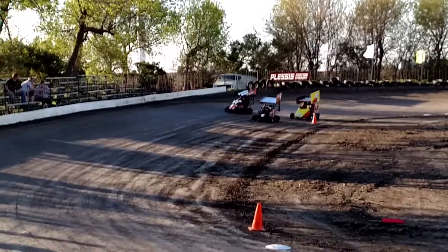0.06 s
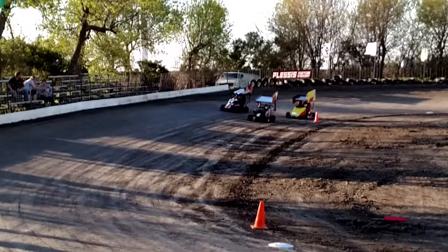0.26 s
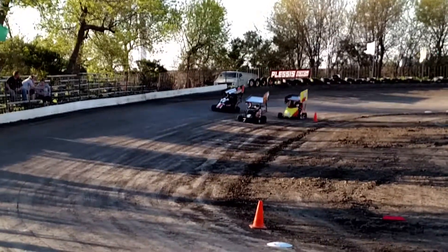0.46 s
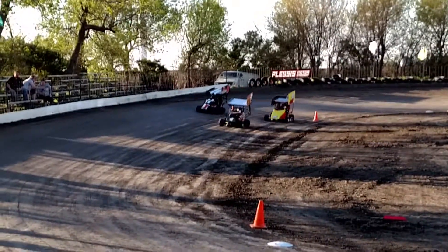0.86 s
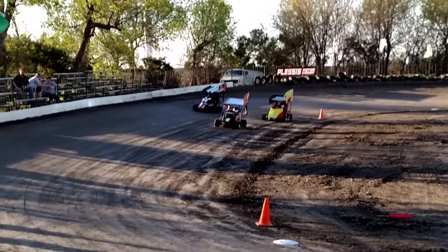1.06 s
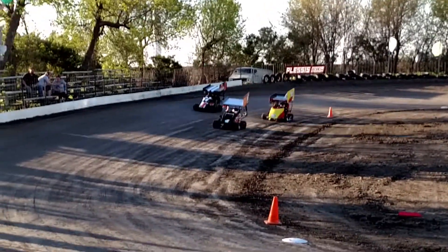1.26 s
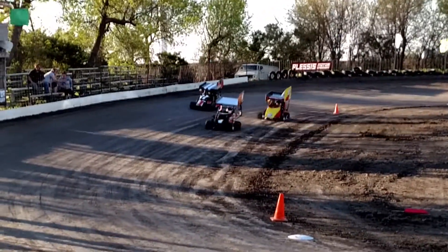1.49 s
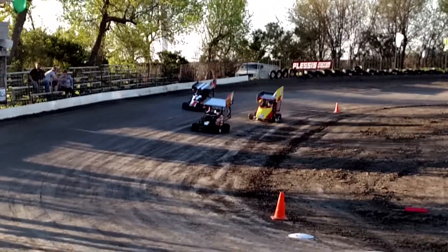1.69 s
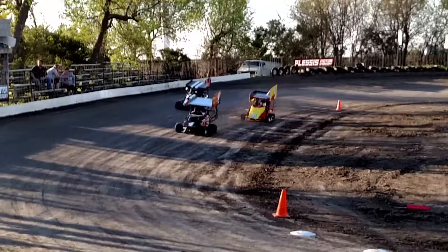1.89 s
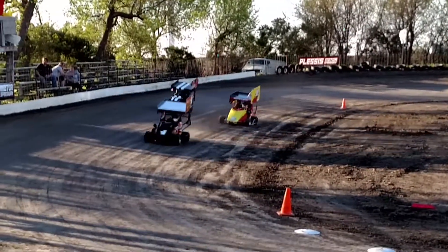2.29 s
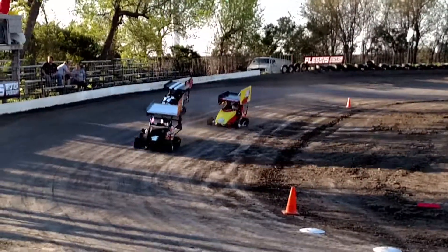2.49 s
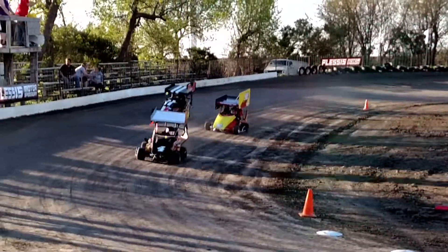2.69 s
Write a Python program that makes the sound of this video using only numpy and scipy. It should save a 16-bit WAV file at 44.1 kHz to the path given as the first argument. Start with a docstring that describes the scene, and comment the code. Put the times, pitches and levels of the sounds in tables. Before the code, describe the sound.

Small race car engines drone with a raspy buzz on an open dirt track. A gust briefly overloads the microphone, the engines grow louder among a few dry clicks, and the wind buffets again as one car accelerates.

```python
"""Three small single-cylinder race cars come out of a dirt turn: one holds its revs, one speeds up,
one is far off. Each firing thumps through an exhaust pipe over rasp and hiss; wall and trees answer.
Near 0.6 s a gust thumps and cracks on the microphone, overloading it, and the limiter ducks the cars.
The engines swell toward 1.4 s, among a few dry clicks. From 2 s the nearest engine ticks and more
gusts hit. At the end, 2.85 s, the steady car fades and the far one grows loud."""
import sys
import numpy as np
from scipy import signal
from scipy.fft import rfft, irfft, next_fast_len
from scipy.io import wavfile
from scipy.ndimage import map_coordinates

SR = 44100
rng = np.random.default_rng(int(sys.argv[2]) if len(sys.argv) > 2 else 0)


def wrap_up_sound(samples):
    """Save the sound to the file named by the first command line argument, as 16-bit audio."""
    columns = np.atleast_2d(samples).T
    # keep every value between -1 and 1, then stretch to whole-number steps
    tamed = np.clip(columns, -1, 1)
    steps = np.round(tamed * 32767).astype(np.int16)
    wavfile.write(sys.argv[1], SR, steps)


N = 125685


def amp(db):
    """Decibels to gain."""
    return 10 ** (np.asarray(db) / 20)


def unit(x):
    """Scale to rms 1."""
    return x / np.sqrt(np.mean(x ** 2) + 1e-20)


def along(points, hz):
    """Interpolate (Hz, value) points on a log axis."""
    knots_hz, values = np.transpose(points)
    return np.interp(np.log(hz + 1), np.log(knots_hz + 1), values)


def curves(rows):
    """One value per sample for each column after the time."""
    times_s, *columns = np.transpose(rows)
    return [np.interp(np.arange(N) / SR, times_s, column) for column in columns]


def wobble(rate_hz):
    """Smooth random curve, rate_hz knots a second."""
    knots = rng.standard_normal(int(N * rate_hz / SR) + 4)
    return map_coordinates(knots, [np.arange(N) * rate_hz / SR])


def colour(x, points):
    """Minimum-phase filter with the given (Hz, dB) response."""
    size = 2 * next_fast_len(N)
    cepstrum = irfft(along(points, np.fft.rfftfreq(size, 1 / SR)) * np.log(10) / 20, size)
    cepstrum[1:size // 2] *= 2
    cepstrum[size // 2 + 1:] = 0
    return irfft(rfft(x, size) * np.exp(rfft(cepstrum)), size)[:N]


# Outdoor decay. Each row: frequency in Hz, t60 in seconds.
ECHO_T60_S = [(150, 0.53), (1500, 0.95), (8000, 0.19)]

def echo(x):
    """Diffuse answer of the wall and the trees."""
    hz, t, noise = signal.stft(rng.standard_normal(SR // 2), SR, nperseg=256)
    decay = amp(-60 * t / along(ECHO_T60_S, hz)[:, None])
    tail = signal.istft(noise * decay, SR, nperseg=256)[1]
    return signal.fftconvolve(x, tail / np.linalg.norm(tail))[:N]


# Hiss spectrum. Each row: frequency in Hz, gain in dB.
HISS_SPECTRUM_DB = [(1500, -17.5), (3300, 4.5), (3700, 1.5), (4150, -6), (4600, 0), (5300, -3.5),
                    (6500, -8.5), (7800, -14.5), (9000, -18.5), (12000, -26), (15500, -31.5)]
# Hiss envelope. Each row: time in seconds, relative level in dB.
HISS_LEVEL_DB = [(0, -67), (.45, -65.5), (.9, -60), (1.4, -60), (1.65, -55.5), (2, -60.5), (2.22, -57.5),
                 (2.45, -60.5), (2.65, -62), (2.85, -56.5)]

def hiss(lift_db=3.5):
    """Flickering hiss of chains and tyres."""
    noise = unit(colour(rng.standard_normal(N), HISS_SPECTRUM_DB))
    return noise * amp(curves(HISS_LEVEL_DB)[0] + lift_db + 1.3 * wobble(90))


# Valve resonances. Each row: frequency in Hz, gain in dB.
TICK_SPECTRUM_DB = [(2000, -14), (3200, 12), (4100, -9.5), (5000, 8.5), (6000, -3), (7000, -8),
                    (7900, -6.5), (9000, -18.5), (15000, -32.5)]
# Tick envelope. Each row: time in seconds, level in dB.
TICK_LEVEL_DB = [(0, -89), (1.9, -73), (2.2, -55), (2.5, -63), (2.85, -53.5)]

def valve_ticks():
    """The valves of the nearest engine tick once a cycle."""
    bursts = puffs(RISING_FIRING_HZ, decay_cycles=.14, floor=.08, lag_cycles=.63)
    return unit(colour(bursts, TICK_SPECTRUM_DB)) * amp(curves(TICK_LEVEL_DB)[0] + 1.4 * wobble(30))


# Each row: start in seconds, level in dB, pitch in Hz, t60 in seconds, second mode in relative dB.
DRY_CLICKS = [(0.0804, -17.5, 724, 0.01, -10.5), (1.079, -37, 3020, 0.018, -24.5),
              (1.590, -9, 1018, 0.008, -6.5), (1.827, -25.5, 1220, .005, -10),
              (1.942, -27.5, 2480, 0.01, -20), (2.5106, -16, 1050, 0.008, -9.5)]

def clicks(overtone_ratio=2.16):
    """Short dry clicks, each with two quickly damped modes."""
    out, t = np.zeros(N + SR), np.arange(SR // 20) / SR
    for start_s, db, hz, t60_s, second_db in DRY_CLICKS:
        phase = 2 * np.pi * hz * t
        modes = np.sin(phase) - amp(second_db) * np.sin(overtone_ratio * phase)
        out[round(start_s * SR):][:len(t)] += amp(db - 60 * t / t60_s) * modes
    return out[:N]


# Turbulence and crack spectra. Each row: frequency in Hz, gain in dB.
BUFFET_SPECTRUM_DB = [(15, -15), (30, -2.5), (60, -1.5), (120, 2), (180, 2.5), (300, -7), (450, -16.5),
                      (700, -22.5), (1200, -41.5), (3000, -54), (8000, -94)]
CRACK_SPECTRUM_DB = [(300, 6), (1100, 7), (2000, -7), (4000, -15), (8000, -30), (15000, -35)]
# Turbulence envelope. Each row: time in seconds, relative level in dB.
WIND_LEVEL_DB = [(0, -23), (.04, -29.5), (.08, -40), (.19, -36.5), (.25, -25.5), (.29, -37), (.32, -22),
                 (.47, -23), (.53, -16.5), (.58, -23), (.64, -14), (.72, -20.5), (.83, -18), (.89, -31.5),
                 (1.07, -39.5), (1.115, -19), (1.16, -21.5), (1.2, -21.5), (1.38, -45), (1.52, -28.5),
                 (1.58, -35), (1.7, -30.5), (1.82, -38.5), (1.95, -28), (2.05, -31.5), (2.13, -34),
                 (2.21, -24), (2.26, -9), (2.33, -18), (2.37, -15.5), (2.41, -20.5), (2.45, -12.5),
                 (2.5, -22), (2.555, -15.5), (2.59, -27.5), (2.68, -31), (2.85, -44)]
# Eddies. Each row: centre in seconds, envelope peak in dB, pitch in Hz.
EDDIES = [(.322, -8.5, 113), (0.341, -10, 126), (0.3739, -1, 156), (.407, -3.5, 200), (.4375, -10, 200),
          (0.5117, -5.5, 120), (0.523, -12, 378), (0.5312, -5, 167), (0.542, -8, 210), (.550, -10, 98),
          (0.594, -9.5, 165), (0.608, 4, 149), (0.6273, 7, 124.5), (0.6449, 1, 274), (0.6601, 5.5, 212),
          (0.668, 1.5, 135), (.682, 0, 150), (0.7015, 5.5, 264), (0.7525, 0, 164), (0.843, -6, 233),
          (1.124, -1.5, 162), (1.129, -5, 194), (1.141, -10, 132), (1.148, -6, 160), (1.868, -19, 189),
          (2.036, -5, 116), (2.237, -5, 220), (2.25, -14.5, 165), (2.2651, -3, 190), (2.274, -3.5, 99),
          (2.3001, 0.5, 295), (2.3132, 2.5, 156), (2.358, -4.5, 219), (2.379, -4.5, 166),
          (2.435, -9.5, 304), (2.4534, -4, 139), (2.538, -9, 150), (2.553, -3.5, 158), (2.558, -12, 470),
          (2.569, 3.5, 146)]

def wind(width_cycles=.48, steepen=.31, crack_s=.6085, crack_db=-15):
    """Turbulence and steep-fronted eddies push and pull the diaphragm; one gust near 0.6 s cracks."""
    out = unit(colour(rng.standard_normal(N), BUFFET_SPECTRUM_DB)) * amp(curves(WIND_LEVEL_DB)[0] + 3)
    for centre_s, db, hz in EDDIES:
        offset_cycles = (np.arange(N) / SR - centre_s) * hz
        phase = 2 * np.pi * offset_cycles
        envelope = amp(db) * np.exp(-.5 * (offset_cycles / width_cycles) ** 2)
        out -= envelope * np.sin(phase + steepen * np.sin(phase))
    crack = colour(signal.unit_impulse(N, round(crack_s * SR)), CRACK_SPECTRUM_DB)
    return out - amp(crack_db) * crack / np.abs(crack).max()


def cycles(firing_hz):
    """Engine cycles completed so far."""
    return np.cumsum(curves(firing_hz)[0]) / SR


def puffs(firing_hz, decay_cycles, floor, lag_cycles=0):
    """Noise that jumps once an engine cycle and decays toward a floor."""
    age_cycles = (cycles(firing_hz) - lag_cycles) % 1
    return unit((floor + np.exp(-age_cycles / decay_cycles)) * rng.standard_normal(N))


# Escaping gas. Each row: frequency in Hz, gain in dB.
RASP_SPECTRUM_DB = [(100, -24), (400, -12), (570, 3), (800, 14), (1100, 8), (1450, 8.5), (1850, 6),
                    (2100, .5), (2500, -1.5), (3400, -14), (4100, -29), (6000, -54.5)]
# Rasp envelope. Each row: time in seconds, relative level in dB.
RASP_LEVEL_DB = [(0, -51.5), (.17, -50), (.42, -46.5), (.7, -48.5), (1.05, -45.5), (1.45, -44), (1.65, -46),
                 (2.2, -45), (2.5, -52), (2.7, -49.5), (2.85, -40.5)]

def rasp(lift_db=3):
    """Gas escapes from the two near cars, a puff per firing."""
    gas = sum(puffs(car, decay_cycles=.24, floor=.89) for car in (STEADY_FIRING_HZ, RISING_FIRING_HZ))
    level_db = curves(RASP_LEVEL_DB)[0] + lift_db + 2 * wobble(26)
    return unit(colour(gas, RASP_SPECTRUM_DB)) * amp(level_db)


def scatter(x, max_delay_s=.042, step_hz=55, full_hz=900):
    """Ground and wall paths delay each frequency differently, highs most, blurring firings to a buzz."""
    size = next_fast_len(N + SR // 2)
    hz = np.fft.rfftfreq(size, 1 / SR)
    knots = rng.random(SR // (2 * step_hz) + 2)
    spread = np.interp(hz / step_hz, np.arange(len(knots)), knots)
    delay_s = max_delay_s * np.minimum(hz / full_hz, 1) * spread
    phase = 2 * np.pi * np.cumsum(delay_s) * SR / size
    return irfft(rfft(x, size) * np.exp(-1j * phase), size)[:N]


# Exhaust tone. Each row: time in seconds, middle band gain in dB, upper band gain in dB.
SWING_DB = [(0, 3.5, 1.5), (.8, 0, -1.5), (1.3, 1, -6), (1.65, 3.5, 1.5), (1.9, -2, 1), (2.2, -4, 3),
            (2.5, -0.5, 4.5), (2.85, -2.5, -1.5)]

def swing(notes, middle_hz=330, upper_hz=570):
    """The middle resonance fades and the upper harmonics swell as the cars turn toward the listener."""
    middle_db, upper_db = curves(SWING_DB)
    low, body = [signal.sosfiltfilt(signal.butter(4, hz, fs=SR, output="sos"), notes)
                 for hz in (middle_hz, upper_hz)]
    return low + amp(middle_db) * (body - low) + amp(upper_db) * (notes - body)


def exhaust(firing_hz, level_db, pipe_db, jitter_s, spread_db, waver_cycles=.006):
    """One pressure pulse per firing of a slightly wavering crank, ringing in the pipe."""
    count = cycles(firing_hz) + waver_cycles * wobble(5.105)
    onsets = np.interp(np.arange(1, int(count[-1]) + 1), count, np.arange(N))
    timing, strength = rng.uniform(-1, 1, (128, 2))[:len(onsets)].T
    onsets = np.clip(np.round(onsets + jitter_s * SR * timing), 0, N - 1).astype(int)
    pulses = np.bincount(onsets, amp(spread_db * strength), N)
    return unit(scatter(colour(pulses, pipe_db))) * amp(level_db)


# Engine speeds. Each row: time in seconds, firing rate in Hz.
STEADY_FIRING_HZ = [(0, 31.9), (.25, 32.2), (.7, 33.3), (.95, 33.15), (1.35, 33.2), (1.7, 33.35),
                    (2.1, 33.05), (2.85, 32)]
RISING_FIRING_HZ = [(0, 26.5), (1, 26.4), (1.27, 27.4), (1.58, 29.3), (1.8, 30.9), (2.08, 31.5),
                    (2.28, 32.4), (2.6, 33.9), (2.75, 34.7), (2.85, 35)]
FAR_FIRING_HZ = [(0, 27.2), (.2, 27.4), (.35, 29), (.6, 30.1), (1.7, 29), (2.85, 30.2)]
# Pipe resonances. Each row: frequency in Hz, gain in dB.
STEADY_PIPE_DB = [(30, -35), (100, -20), (165, -5), (200, 1), (232, 3), (264, -19), (350, -19), (398, -10),
                  (430, -9), (465, -7), (498, -15), (555, -29), (600, -27), (630, -15), (665, -20),
                  (700, -26), (732, -18), (765, -24), (798, -10.5), (835, -27), (865, -17), (900, -24),
                  (930, -27), (965, -17), (1040, -33), (1100, -30), (1400, -36), (1850, -38), (2100, -48),
                  (5000, -70), (12000, -95)]
RISING_PIPE_DB = [(30, -40), (100, -17), (156, -9), (190, -1), (220, 3), (252, -10), (310, -18), (375, -10),
                  (405, -16), (437, -6), (468, -4.5), (505, -14), (580, -27), (625, -20), (690, -24),
                  (750, -22), (800, -14.5), (842, -18), (878, -12), (940, -21), (1060, -28), (1400, -32),
                  (1850, -31), (2100, -44), (5000, -64), (12000, -92)]
FAR_PIPE_DB = [(30, -36), (100, -20.5), (155, 3), (212, 12.5), (260, -9.5), (330, -8), (440, 4), (485, -10),
               (560, -21), (630, -32.5), (730, -5), (865, -10), (1100, -32), (1700, -39), (2500, -47),
               (5000, -67.5), (12000, -78.5)]
# Exhaust envelopes. Each row: time in seconds, then steady, rising and far car in relative dB.
EXHAUST_LEVEL_DB = [(0, -30.5, -33, -37), (.5, -34, -31.5, -33), (1, -29.5, -24, -30),
                    (1.4, -25, -24.5, -25.5), (1.8, -26.5, -26, -31.5), (2.2, -26.5, -25, -37.5),
                    (2.55, -30.5, -33, -42), (2.85, -43.5, -32.5, -22)]

def engines():
    """Three exhaust notes: two pulse evenly, the far one raggedly."""
    steady_db, rising_db, far_db = curves(EXHAUST_LEVEL_DB)
    return (exhaust(STEADY_FIRING_HZ, steady_db, STEADY_PIPE_DB, jitter_s=.00006, spread_db=1.5)
            + exhaust(RISING_FIRING_HZ, rising_db, RISING_PIPE_DB, jitter_s=.00008, spread_db=3.5)
            + exhaust(FAR_FIRING_HZ, far_db, FAR_PIPE_DB, jitter_s=.0009, spread_db=14))


def scene():
    """Cars and their echo, with the wind close by; mono."""
    cars = swing(engines()) + rasp()
    return (cars + amp(-9) * echo(cars) + hiss() + valve_ticks() + wind() + clicks())[None]


def limiter(x, threshold_db=-.5, attack_s=.002, release_db_per_s=6.5):
    """Gain ducks fast on overloads and recovers slowly."""
    over_db = np.maximum(20 * np.log10(np.abs(x[0]) + 1e-9) - threshold_db, 0)
    recovery_db = release_db_per_s * np.arange(N) / SR
    duck_db = np.maximum.accumulate(over_db + recovery_db) - recovery_db
    pole = np.exp(-1 / (attack_s * SR))
    return x * amp(-signal.lfilter([1 - pole], [1, -pole], duck_db))


def record(dry):
    """Limiter, faint hiss, soft clipping at full scale, then a band limit."""
    floor_db, top_hz = -76, 15600
    ducked = limiter(dry) + amp(floor_db) * rng.standard_normal(N)
    clipped = ducked / (1 + np.abs(ducked) ** 8) ** (1 / 8)
    size = next_fast_len(N + SR // 2)
    passband = np.fft.rfftfreq(size, 1 / SR) < top_hz
    return irfft(rfft(clipped, size) * passband, size)[..., :N]


dry = scene()
out = record(dry)
wrap_up_sound(out)
```